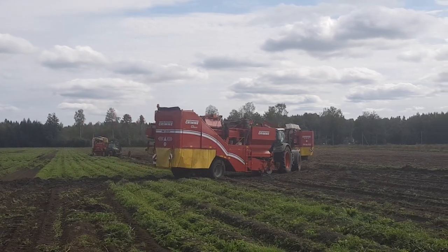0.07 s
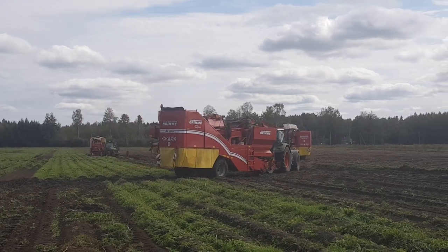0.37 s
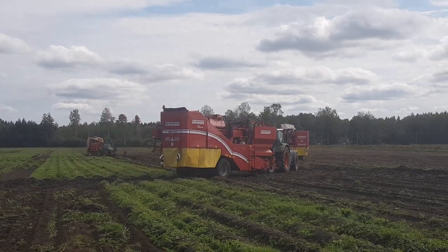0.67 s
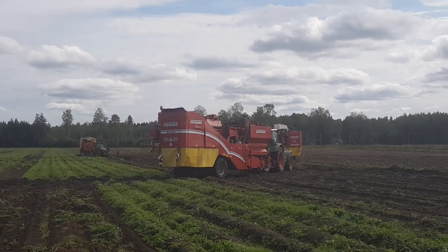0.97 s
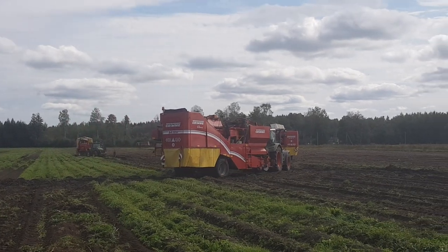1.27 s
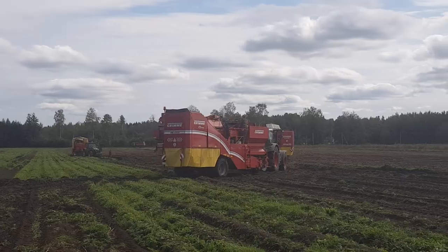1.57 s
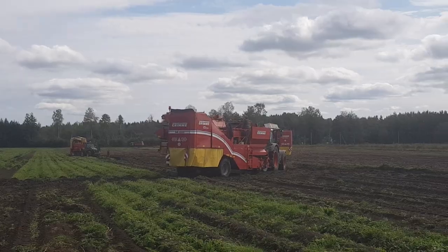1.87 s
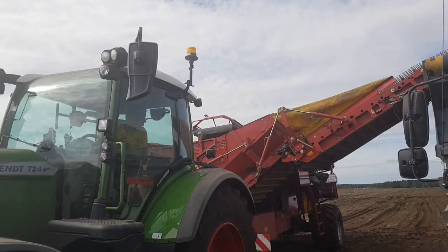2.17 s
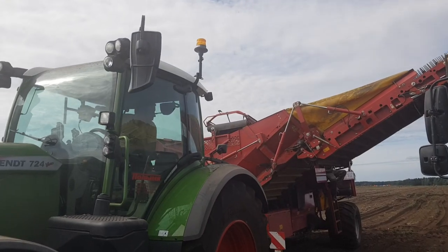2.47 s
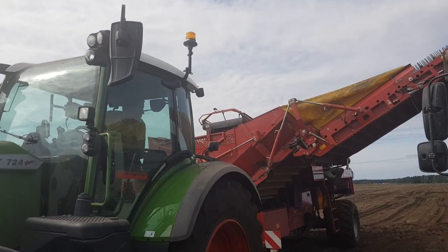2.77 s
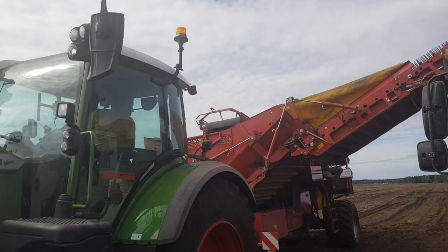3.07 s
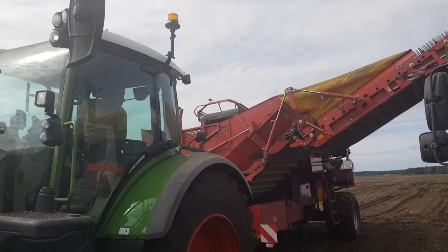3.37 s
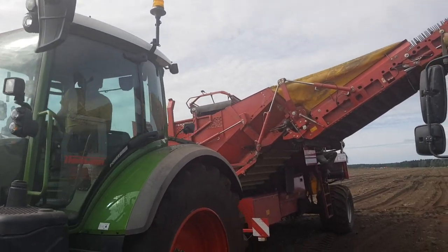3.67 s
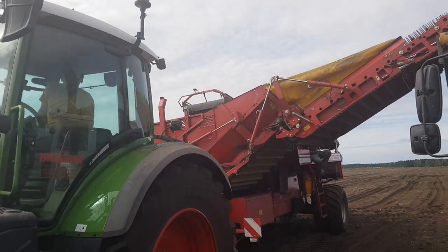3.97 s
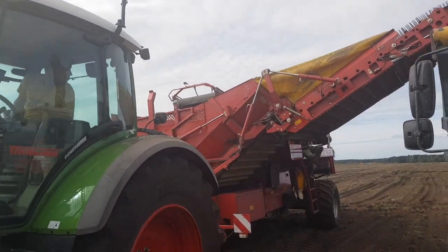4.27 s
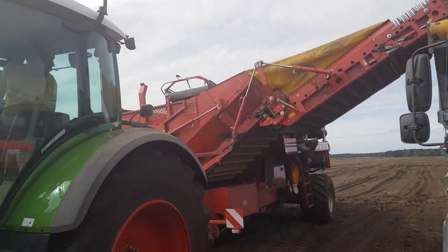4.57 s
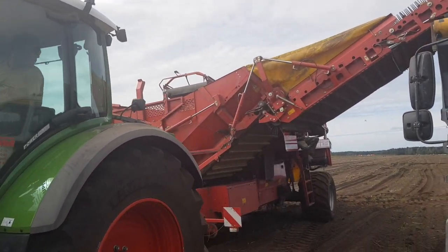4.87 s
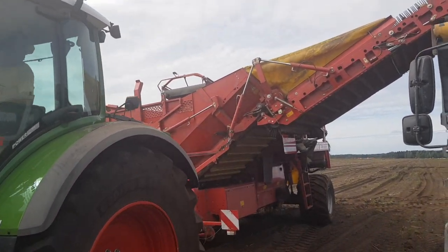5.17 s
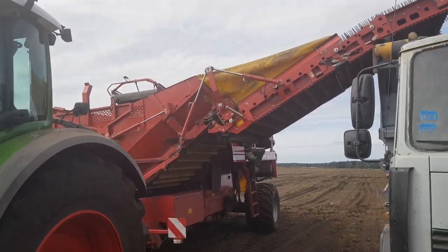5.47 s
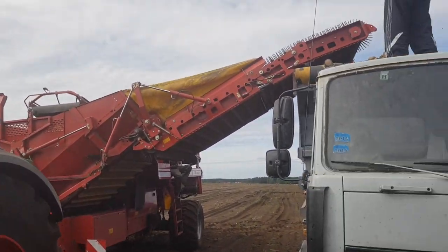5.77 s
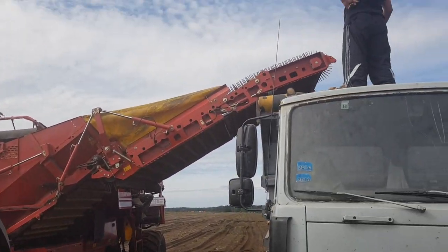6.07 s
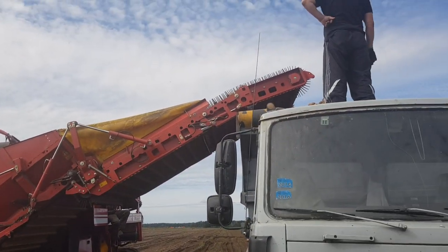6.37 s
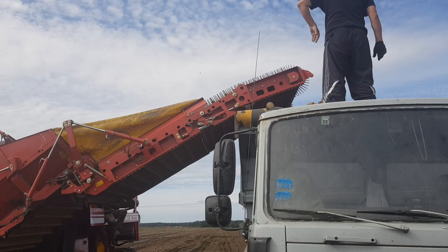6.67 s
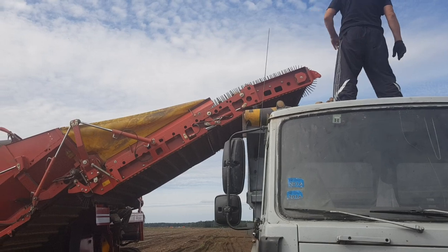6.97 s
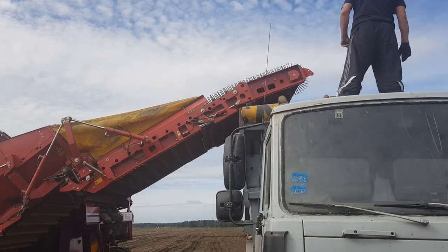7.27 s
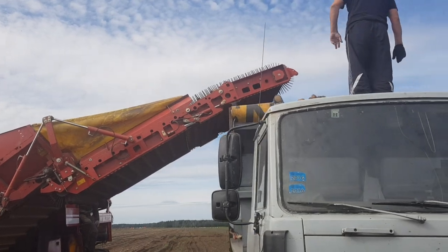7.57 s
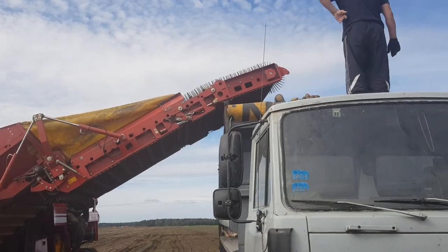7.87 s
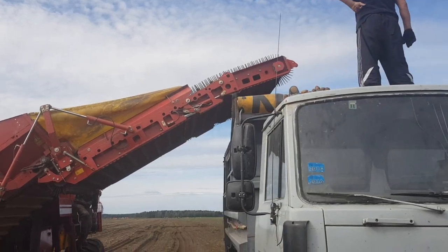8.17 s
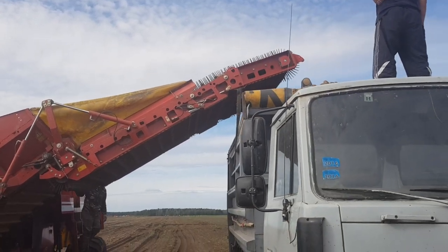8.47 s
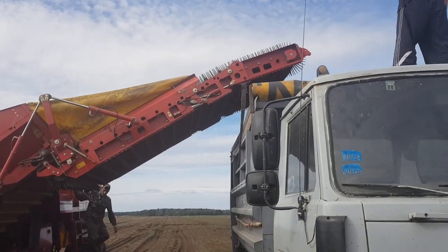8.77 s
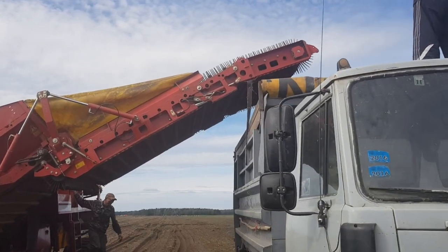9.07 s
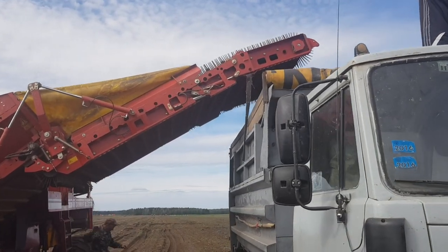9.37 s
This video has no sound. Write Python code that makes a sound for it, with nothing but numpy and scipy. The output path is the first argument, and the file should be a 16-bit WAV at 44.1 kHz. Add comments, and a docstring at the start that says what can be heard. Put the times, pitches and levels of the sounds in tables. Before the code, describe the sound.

Distant farm machinery hums, then close diesel engines knock and clatter while a conveyor jingles, scrapes and squeals briefly.

```python
"""First a potato harvester rumbles far off in a field. After a short silence, at about 1.9 s, the
listener stands by its tractor and moves toward an idling truck. Periodic firings make both diesels
throb and knock, while impacts in the unloading elevator set its chain rattling and jingling.
From about 4.5 s the truck's meshing timing gears whine. Between 6 and 7 s friction makes the
elevator belt scrape and squeal on its guides; then the truck idles on."""
import sys
import numpy as np
from scipy import signal
from scipy.fft import rfft, irfft
from scipy.io import wavfile
from scipy.ndimage import uniform_filter1d

SR = 44100
rng = np.random.default_rng(int(sys.argv[2]) if len(sys.argv) > 2 else 0)


def wrap_up_sound(samples):
    """Save the sound to the file named by the first command line argument, as 16-bit audio."""
    columns = np.atleast_2d(samples).T
    # keep every value between -1 and 1, then stretch to whole-number steps
    tamed = np.clip(columns, -1, 1)
    steps = np.round(tamed * 32767).astype(np.int16)
    wavfile.write(sys.argv[1], SR, steps)


N = 415422
T = np.arange(N) / SR
FREQ = np.maximum(np.fft.rfftfreq(N, 1 / SR), 1)
FAR_END_S, NEAR_START_S = 1.875, 1.92
LOW_CUT_HZ, HIGH_CUT_HZ = 53, 15750

# The listener's path. Each row: time in seconds, truck's share of the power, treble gain in dB.
PATH = [(1.9, 0.07, -0.5), (3.2, 0, -1), (4.5, 0.21, -3.5), (5.0, 0.32, -1.5), (6.0, 0.8, -2),
        (7.3, 0.99, -0.5), (8.4, 1, 0), (9.4, 0.73, 3.5)]
# Likeness of left and right. Each row: frequency in Hz, coherence from 0 to 1.
FAR_COHERENCE = [(40, 1), (1200, 0.99), (2000, 0.5), (2600, 0.29), (3400, 0.96), (4800, 0.48), (7000, .78),
                 (10000, .2)]
NEAR_COHERENCE = [(40, 0.86), (250, 0.99), (700, 0.73), (1400, 0.88), (2200, 0.35), (3500, 0.24),
                  (14000, 0)]
# Direction of each source. Each row: frequency in Hz, left minus right level in dB.
TRACTOR_PAN = [(60, 1.0), (110, 1.5), (200, 1.0), (380, -0.5), (700, -2), (1290, 1.5), (2380, 1.5),
               (4400, 1), (8120, 0.5), (15000, 0.5)]
TRUCK_PAN = [(1200, -2.5), (2400, -5), (3300, 8), (3900, 1), (4600, -4.5), (5800, -3), (7800, -3),
             (14000, -3)]
BELT_PAN = [(4000, 1.5), (7000, -1), (7800, 1), (9400, -6), (10300, 3), (12800, 3), (14000, 2)]
# Spectral envelopes. Each row: frequency in Hz, relative level in dB.
FAR_RUMBLE_SPECTRUM = [(20, -32), (38, -26), (60, -5), (130, -0.5), (205, -4.5), (290, -14.5), (400, -22),
                       (530, -12.5), (750, -17), (950, -11.5), (1180, -14.5), (1350, -22), (1700, -17),
                       (1950, -28.5)]
FAR_CLATTER_SPECTRUM = [(1600, -11), (2150, 0.5), (2450, -16), (2750, -11), (3050, -3), (3600, 0),
                        (4500, -9.5), (5800, -8), (6700, -18.5), (9000, -22.5), (11000, -27), (15500, -28)]
TRACTOR_BODY_SPECTRUM = [(15, -18), (25, -20), (44, -11), (81, -13.5), (147, 0.5), (182, 2), (273, -4.5),
                         (334, -7), (403, -8), (510, -16), (714, -8), (790, -6), (859, -10.5),
                         (1070, -14.5), (1400, -8.5), (1820, -11), (3080, -120)]
TRACTOR_METAL_SPECTRUM = [(590, -26), (1000, 10), (1080, -8), (1200, -2.5), (1530, -1.5), (2310, -3.5),
                          (2810, -8), (3150, -6.5), (4240, -10), (5400, -14), (5850, -13), (7360, -15.5),
                          (9690, -24.5), (11100, -21.5), (12200, -25.5), (15500, -27)]
TRUCK_BODY_SPECTRUM = [(15, -10), (25, -14), (43, -5), (80, -10.5), (118, -0.5), (235, -0.5), (493, -11),
                       (613, -9.5), (667, -13.5), (776, -13), (888, -16.5), (1290, -18.5), (1400, -8),
                       (1820, -54), (3080, -120)]
TRUCK_METAL_SPECTRUM = [(590, -31), (1000, 4), (1300, 1), (2310, -1), (2770, -5), (3110, -5), (3570, -7),
                        (3870, -1.5), (4100, -5.5), (4700, -2), (5400, -12.5), (6870, -11), (8540, -21.5),
                        (11200, -19), (15500, -25)]
SCRAPE_SPECTRUM = [(1200, -11), (2200, -0.5), (3300, -4), (5000, 0.5), (7000, -0.5), (8500, -6.5),
                   (10000, -3.5), (13000, -4), (15500, -10)]
# Steady tones of exhausts, shafts and gears. Each row: frequency in Hz, relative level in dB.
FAR_HUM = [(42.3, -50.5), (62.4, -54), (85, -67), (157, -56.5), (1190, -70.5)]
TRACTOR_HUM = [(42.6, -41.5), (45.1, -53), (52.8, -38.5), (85.2, -53), (273.8, -37), (737.4, -44),
               (791.5, -51), (1231, -54), (2309, -54.5), (4022, -59)]
TRUCK_HUM = [(42.6, -38), (45.1, -56), (52.8, -52), (80.2, -44.5), (85.2, -48.5), (120.3, -42.5),
             (212.5, -43), (627, -49.5), (701, -55), (762.5, -54)]
# Damped modes. Each row: natural frequency in Hz, bandwidth in Hz, relative level in dB.
FAR_LINK_MODES = [(3100, 400, -3), (3950, 250, 5), (5300, 500, 4), (5700, 260, -1)]
NEAR_LINK_MODES = [(4990, 100, 3.5), (5400, 120, 5.5), (5520, 120, 2.5), (11200, 600, -13)]
LOOSE_METAL_MODES = [(2090, 110, -1), (2340, 110, 3), (3080, 110, -4), (4660, 170, -1.5)]
BELT_GUIDE_MODES = [(2230, 400, -4), (3400, 180, 6.5), (4740, 300, -4), (6660, 360, 4.5), (7540, 200, 3),
                    (10150, 250, -10), (11600, 250, -3), (12750, 250, -1), (13700, 250, -4)]
TRUCK_BODY_MODES = [(256, 32, -9.5)]
# Passing tones. Each row: start and length in seconds, pitch in Hz, relative level in dB.
DISTANT_WHINES = [(-.3, 1.55, 3555, -65.5), (1.25, .7, 3560, -70), (.7, .6, 4750, -75),
                  (1.3, .7, 4700, -73), (.525, .075, 5600, -64), (.56, .135, 5870, -65.5),
                  (1.36, .05, 5750, -68.5), (1.44, .12, 5800, -68.5)]
LINK_CHIRPS = [(2.045, .014, 5500, -41), (2.222, .016, 5450, -42), (2.638, .02, 5520, -46),
               (2.679, .014, 5040, -42.5), (2.716, .01, 5000, -46), (2.867, .014, 5000, -39.5),
               (2.908, .007, 5030, -42), (2.982, .01, 5000, -44), (2.996, .014, 5400, -41.5),
               (3.02, .008, 5000, -39), (3.055, .015, 5350, -45), (3.211, .008, 5000, -43),
               (4.385, .012, 5350, -43.5), (9.183, .01, 5000, -36)]
PANEL_DRONES = [(4.38, 0.095, 233, -26), (4.68, 0.1, 233, -28), (5.05, .9, 212.5, -40),
                (6.142, 0.28, 241.4, -34.5), (6.45, 0.16, 120.2, -35), (7.242, 0.2, 231.4, -31),
                (7.85, .22, 230, -34.5), (8.534, 0.13, 280, -32), (9.13, .3, 119.8, -35.5)]
# Bursts of noise. Each row: start and length in seconds, relative level in dB.
FAR_CHAIN_SWISHES = [(0.475, 0.075, -60), (.55, .055, -57), (.61, .08, -64), (1.36, 0.2, -69),
                     (1.5, .04, -68)]
BELT_SCRAPES = [(5.983, 0.11, -32.5), (6.09, 0.14, -31), (6.325, 0.082, -35), (6.47, .1, -41),
                (6.577, 0.15, -27.5), (6.63, 0.058, -28.5)]
# Blows on the elevator frame. Each row: time in seconds, peak in dB, resonance and bandwidth in Hz.
FRAME_KNOCKS = [(2.691, -24, 1000, 500), (2.993, -23, 900, 500), (3.663, -19, 850, 600),
                (3.664, -23, 2400, 1500), (4.572, -20.5, 3700, 1800), (5.003, -26, 1800, 2000),
                (5.245, -26, 3800, 1000), (5.511, -21, 2300, 700), (8.329, -19, 4600, 400),
                (8.354, -20.5, 4550, 500), (9.108, -24, 3800, 600)]
# Belt squeals. Each row: start and length in seconds, pitch in Hz, fractional glide, level in dB.
BELT_SQUEALS = [(5.979, .018, 7830, -.01, -27), (6.01, 0.039, 7710, 0.0028, -26.5),
                (6.012, 0.047, 12820, 0, -41), (5.99, 0.07, 10080, -.015, -39),
                (6.075, 0.095, 9500, -.012, -34.5), (6.18, 0.04, 9400, -.003, -32.5),
                (6.351, 0.032, 9340, -.018, -31), (6.578, .03, 12700, .01, -34),
                (6.606, .028, 12950, .035, -33), (6.638, 0.008, 7120, -0.016, -13),
                (6.654, 0.015, 7020, -0.014, -16), (6.641, .022, 13850, 0, -30),
                (6.648, .01, 10250, 0, -43), (6.684, 0.0054, 6900, -0.00037, -20),
                (6.685, .011, 13700, .005, -26), (6.689, 0.007, 10250, 0, -40),
                (6.693, 0.018, 7060, 0, -17.5), (6.697, 0.015, 6880, -.005, -18.5),
                (6.699, .03, 13900, -.065, -37)]
# Gear mesh lines. Each entry: a multiple of the truck's firing rate; below, its relative level in dB.
MESH_ORDERS = [38, 76, 77, 94, 95, 96]
MESH_DB = [-4, -0.5, -32, -33, 4, -0.5]
# Tones reach the two sides by different paths. Each pair: left and right phase in radians.
WHINE_PHASES = [0.9, -0.9]
SQUEAL_PHASES = [0.45, -0.45]
# Brief swells and sags. Each row: start and length in seconds, change in dB.
WHINE_SWELLS = [(6.75, 0.96, -4.5), (7.9, .38, 1), (8.3, .2, -5), (8.52, .6, 2), (9.138, .16, -6)]
BOOM_SWELLS = [(2.39, 0.086, -3.5), (2.54, 0.055, 3), (3.176, .06, 2.5), (3.23, 0.045, -2),
               (3.66, 0.046, 3), (3.763, .06, -0.5), (3.867, .13, 2), (4.088, 0.089, -3.5)]
# Dips of the machine noise. Each row: start and hold in seconds, depth in dB.
LEVEL_DIPS = [(4.766, 0.44, 2), (6.634, 0.98, 5)]
# The truck's settling idle. Each row: time in seconds, firing rate in Hz.
TRUCK_FIRING_RATE = [(5.4, 41.05), (6.0, 40.62), (6.6, 40.1), (7.6, 40.05), (7.95, 40.2), (8.3, 40.0),
                     (8.75, 40.12), (9.4, 40.0)]
# Bands along the path. Each row: time in seconds, then engine boom, casing roar and clatter in dB.
BAND_LEVELS = [(1.95, -27, -33.5, -38.5), (3.35, -25.5, -31.5, -36.5), (4.62, -25, -34.5, -34.5),
               (4.76, -28.5, -36.5, -38.5), (4.83, -30, -38.5, -37), (5.1, -28.5, -37, -37.5),
               (5.7, -30.5, -40.5, -38.5), (6.55, -30, -38.5, -37.5), (7.3, -29, -37.5, -38),
               (8.55, -29, -35, -37), (9.42, -28.5, -34, -39.4)]


def undb(db):
    """Amplitude ratio for a level in decibels."""
    return 10 ** (np.asarray(db) / 20)


def unit(x):
    """Normalisation to rms 1."""
    return x / np.sqrt(np.mean(x ** 2))


def curves(table):
    """Linear interpolation of each column in time."""
    times, *columns = np.transpose(table)
    return [np.interp(T, times, column) for column in columns]


def across(points):
    """Interpolation on a logarithmic frequency axis."""
    hz, value = np.transpose(points)
    return np.interp(np.log(FREQ), np.log(hz), value)


def shape(x, gain):
    """Filtering as multiplication of the spectrum."""
    return irfft(rfft(x) * gain, N)


def below(hz):
    """Fifth-order Butterworth low-pass gain."""
    return 1 / np.sqrt(1 + (FREQ / hz) ** 10)


def above(hz):
    """High-pass gain, the power complement of below()."""
    return np.sqrt(1 - below(hz) ** 2)


def band_unit(x, lo_hz, hi_hz):
    """Normalisation of the stereo centre to rms 1 within a band."""
    return x / np.std(shape(x.mean(axis=0), (FREQ > lo_hz) & (FREQ < hi_hz)))


def wander(rate):
    """Smoothed noise with a spread near 1 and `rate` changes a second."""
    hold = max(int(SR / rate), 1)
    steps = np.repeat(rng.standard_normal(N // hold + 1), hold)[:N]
    return 1.304 * uniform_filter1d(uniform_filter1d(steps, hold), hold)


def cycles(hz, drift):
    """Phase in cycles, the integral of a slightly drifting frequency."""
    return np.cumsum(hz * (1 + drift * wander(5))) / SR


def gate(start, length, edge_s, t=T):
    """Amplitude envelope with soft edges."""
    return (1 + np.tanh((t - start) / edge_s)) * (1 + np.tanh((start + length - t) / edge_s)) / 4


def resonances(modes):
    """Superposed complex responses of damped oscillators."""
    return sum(undb(db) / (1 + 1j * (FREQ / hz - hz / FREQ) * hz / width) for hz, width, db in modes)


def pan(balance):
    """Level difference between the sides, as two gains by frequency."""
    return undb(np.array([[.5], [-.5]]) * across(balance))


def stereo(pair, coherence, lag_ms):
    """Partial coherence: two signals mix as mid and side; a positive lag delays the right."""
    alike = np.clip(across(coherence), 0, .999)
    mid, side = shape(pair[0], np.sqrt(1 + alike)), shape(pair[1], np.sqrt(1 - alike))
    return np.array([mid + side, shape(mid - side, np.exp(-2j * np.pi * FREQ * lag_ms / 1000))])


def combustion(turn, repeat, knock, decay, scatter_db, cylinders=6):
    """Periodic excitation: each firing is a dying burst; part recurs on each round of the cylinders."""
    firing, phase = turn.astype(int), turn % 1
    size = int(cylinders * N / turn[-1])
    place = turn % cylinders / cylinders * size
    pattern = np.array([np.interp(place, np.arange(size), p) for p in rng.standard_normal((2, size))])
    noise = np.sqrt(repeat) * unit(pattern) + np.sqrt(1 - repeat) * rng.standard_normal((2, N))
    scatter = rng.standard_normal(N)[firing] + .5 * rng.standard_normal(cylinders)[firing % cylinders]
    return unit(noise * (1 + knock * undb(scatter_db * scatter) * np.exp(-phase / decay)))


def rattle(rate, spread_db, ring_s):
    """Poisson impacts: random blows, a few much harder than the rest, decay exponentially."""
    blows = (rng.random(N) < rate / SR) * undb(spread_db * np.minimum(rng.exponential(size=N), 4))
    power = signal.lfilter([1], [1, -np.exp(-2 / (ring_s * SR))], blows ** 2)
    return unit(np.sqrt(power + 1e-12) * rng.standard_normal((2, N)))


def ring_mode(blows, mode, skirt):
    """Resonance in one mode; a band `skirt` times as wide steepens its flanks."""
    hz, width, _ = mode
    return shape(blows, resonances([mode]) * resonances([(hz, skirt * width, 0)]))


def hum(table, drift, waver_db):
    """Line spectrum of rotating machinery, wandering in pitch and strength."""
    return sum(np.sqrt(2) * undb(db + waver_db * wander(4.3)) * np.sin(2 * np.pi * cycles(hz, drift))
               for hz, db in table)


def far_harvester():
    """Interference with the bounce off the soil notches a distant rumble; chains swish, tones whine."""
    rumble_db = -46 - 0.7 * T + 1.3 * wander(7.6)  # fades as it recedes
    turn = cycles(hz=62.4, drift=0.00407)
    throb = combustion(turn, repeat=0.21, knock=0.46, decay=0.24, scatter_db=0.5)
    rumble = unit(shape(throb, undb(across(FAR_RUMBLE_SPECTRUM)) * below(2330)))
    knock = combustion(turn, repeat=.07, knock=.45, decay=.25, scatter_db=5.0)
    clatter = unit(shape(knock, undb(across(FAR_CLATTER_SPECTRUM)) * above(1600)))
    links = rattle(rate=1300, spread_db=5.0, ring_s=.015)
    swish = unit(shape(links, resonances(FAR_LINK_MODES) * below(8100)))
    swish *= sum(undb(db) * gate(s, length, edge_s=.018) for s, length, db in FAR_CHAIN_SWISHES)
    whine = 0
    for start, length, hz, db in DISTANT_WHINES:
        envelope = undb(db + 1.9 * wander(39.4)) * gate(start, length, edge_s=.08)
        whine += envelope * np.sin(2 * np.pi * cycles(hz, drift=0.00306) + 1.1 * wander(90))
    noise = undb(rumble_db) * rumble + undb(-61.5) * clatter + swish
    noise = stereo(noise, FAR_COHERENCE, lag_ms=-0.032) / np.sqrt(2)
    return noise + whine + hum(FAR_HUM, drift=0.00376, waver_db=-3.5)


def loose_fittings(truck_share):
    """Impact excitation: loose metal on the truck taps, each part ringing its own mode."""
    taps = sum(ring_mode(rattle(rate=28, spread_db=2.5, ring_s=.003), mode, skirt=5)
               for mode in LOOSE_METAL_MODES)
    return unit(taps) * undb(-43.5) * truck_share


def chain_jingle():
    """Modal ringing: loose links collide in clusters, fading as they are left behind."""
    level_db = -43 - 0.5 * (T - NEAR_START_S)
    links = 0
    for mode in NEAR_LINK_MODES:
        blows = rattle(rate=500, spread_db=1.5, ring_s=0.0068)
        links += ring_mode(blows, mode, skirt=4) * undb(2.1 * wander(22.06))
    return unit(links) * undb(level_db) * gate(0, length=4.56, edge_s=.1)


def link_chirps():
    """Dry friction: turning links give short rough chirps near their ringing pitch."""
    wavering_time = np.cumsum(1 + .025 * wander(900)) / SR
    grip = np.sqrt(2) * undb(6 * np.array([wander(500), wander(500)]))
    return grip * sum(undb(db) * gate(s, length, edge_s=.003) * np.sin(2 * np.pi * hz * wavering_time)
                      for s, length, hz, db in LINK_CHIRPS)


def frame_knocks():
    """Transient response: each hard blow excites a broad resonance of the elevator frame."""
    knocks = 0
    for start, db, hz, width in FRAME_KNOCKS:
        blow = rng.standard_normal((2, N)) * (T >= start) * np.exp(-np.abs(T - start) / 0.0023)
        ring = shape(blow, resonances([(hz, width, 0)]))
        knocks += undb(db) * ring / np.abs(ring).max()
    return knocks


def panel_drones():
    """Sympathetic resonance: panels hum briefly when the engines shake them at their own pitch."""
    wobble = 0.39 * wander(25)
    return sum(np.sqrt(2) * undb(db) * gate(s, length, 0.021) * np.sin(2 * np.pi * hz * T + wobble)
               for s, length, hz, db in PANEL_DRONES)


def gear_whine(truck_turn, truck_share):
    """Tooth meshing: timing gears sing with sidebands one firing rate apart, louder near the truck."""
    level_db = -45 - 14 * (1 - truck_share)
    level_db += sum(db * gate(s, length, edge_s=.03) for s, length, db in WHINE_SWELLS)
    side_phase, side_db = np.array(WHINE_PHASES)[:, None], np.array([[4.0], [-2.0]])
    lines = 0
    for order, db in zip(MESH_ORDERS, MESH_DB):
        flutter = undb(db + 1.7 * wander(55) + 0.93 * wander(9))
        lines += flutter * np.sin(2 * np.pi * order * truck_turn + 0.34 * wander(70) + side_phase)
    return lines * undb(level_db + side_db) * gate(start=4.5, length=6, edge_s=1.0)


def belt_scrapes():
    """Sliding friction: the belt hisses on its steel guides; each scrape dies away between machines."""
    power = 0
    for start, length, db in BELT_SCRAPES:
        tail = undb(-10.5) * (T > start + length) * np.exp(-np.abs(T - start - length) / 0.11)
        power += (undb(db) * np.maximum(gate(start, length, edge_s=0.021), tail)) ** 2
    drag = np.sqrt(power) * undb(1.2 * wander(110))  # the drag sputters
    slips = rattle(rate=6000, spread_db=1, ring_s=.002)
    return drag * unit(shape(slips, undb(across(SCRAPE_SPECTRUM)) * (1 + resonances(BELT_GUIDE_MODES))))


def belt_squeals():
    """Stick-slip oscillation: the belt catches into unsteady tones, which ring on briefly."""
    squeals = np.zeros((2, N))
    for start, length, hz, glide, db in BELT_SQUEALS:
        span = (T > start - .02) & (T < start + length + .12)
        t = T[span]
        waver = unit(uniform_filter1d(rng.standard_normal(len(t)), size=45))
        pitch = hz * (1 + glide * np.clip((t - start) / length, 0, 1) + 0.009 * waver)
        phase = 2 * np.pi * np.cumsum(pitch) / SR + np.array(SQUEAL_PHASES)[:, None]
        grip = undb(4 * np.tanh(unit(uniform_filter1d(rng.standard_normal((2, len(t))), size=130))))
        octave = undb(-20) * np.sin(2 * phase) * (2 * hz < .95 * HIGH_CUT_HZ)
        ring = undb(-10) * (t > start + length) * np.exp(-np.abs(t - start - length) / 0.024)
        envelope = np.maximum(gate(start, length, edge_s=.003, t=t), ring)
        squeals[:, span] += undb(db) * grip * (np.sin(phase) + octave) * envelope
    return shape(squeals, 1)


def engine_bodies(tractor_turn, truck_turn, truck_share):
    """Forced vibration: the firings throb through each machine's body."""
    tractor = combustion(tractor_turn, repeat=0.11, knock=0.35, decay=0.44, scatter_db=1.0)
    tractor = unit(shape(tractor, undb(across(TRACTOR_BODY_SPECTRUM))))
    truck = combustion(truck_turn, repeat=0.32, knock=0.6, decay=0.23, scatter_db=4.0)
    truck = unit(shape(truck, undb(across(TRUCK_BODY_SPECTRUM)) * (1 + resonances(TRUCK_BODY_MODES))))
    both = np.sqrt(1 - truck_share) * tractor + np.sqrt(truck_share) * truck
    return stereo(both, NEAR_COHERENCE, lag_ms=0.3)


def metal_clatter(tractor_turn, truck_turn, truck_share):
    """Impact noise: the diesels knock in their blocks while links and clods strike the elevator."""
    elevator = undb(-8.5) * rattle(rate=200, spread_db=3.5, ring_s=0.015)
    tractor = combustion(tractor_turn, repeat=.1, knock=0.29, decay=0.17, scatter_db=2.5)
    truck = combustion(truck_turn, repeat=0.21, knock=0.37, decay=0.21, scatter_db=3)
    metal = 0
    for share, knock, colour, sides in ((1 - truck_share, tractor, TRACTOR_METAL_SPECTRUM, TRACTOR_PAN),
                                        (truck_share, truck, TRUCK_METAL_SPECTRUM, TRUCK_PAN)):
        blows = stereo(knock + elevator, NEAR_COHERENCE, lag_ms=0.385)
        metal += np.sqrt(share) * unit(shape(blows, undb(across(colour)) * pan(sides) * above(1270)))
    return band_unit(metal, 1380, 3150)


def near_diesels(truck_turn, truck_share, treble_db):
    """Superposition: boom, roar, clatter and hum of two engines, crossfaded along the path."""
    boom_db, roar_db, clatter_db = curves(BAND_LEVELS)
    tractor_turn = cycles(hz=52.8, drift=.002)
    body = engine_bodies(tractor_turn, truck_turn, truck_share)
    swell_db = sum(db * gate(s, length, edge_s=.015) for s, length, db in BOOM_SWELLS)
    boom = band_unit(shape(body, below(442)), 85, 500) * undb(boom_db + swell_db + 0.66 * wander(16))
    roar = band_unit(shape(body, above(439) * below(1210)), 450, 1340) * undb(roar_db)
    metal = metal_clatter(tractor_turn, truck_turn, truck_share)
    # the treble is shadowed first as the machines screen each other
    metal += (undb(treble_db) - 1) * shape(metal, above(3250) ** 2)
    tones = (1 - truck_share) * hum(TRACTOR_HUM, drift=0.00124, waver_db=3.0)
    tones += truck_share * hum(TRUCK_HUM, drift=0.00117, waver_db=2.5)
    return boom + roar + metal * undb(clatter_db) + tones * undb(0.72 * (boom_db + 27.5))


def dips(fall_s=0.028, recover_s=0.58):
    """Amplitude modulation: the level sinks quickly, holds and recovers slowly."""
    loss_db = 0
    for start, hold, depth_db in LEVEL_DIPS:
        fall, recovery = (T - start) / fall_s, 1 - (T - start - fall_s - hold) / recover_s
        loss_db += depth_db * np.clip(np.minimum(fall, recovery), 0, 1)
    return undb(-loss_db)


def scene():
    """Sources add linearly: the distant harvester, a short silence, then the near machines."""
    truck_share, treble_db = curves(PATH)
    truck_turn = cycles(curves(TRUCK_FIRING_RATE)[0], drift=0.000705)
    machines = near_diesels(truck_turn, truck_share, treble_db) + panel_drones()
    machines += gear_whine(truck_turn, truck_share)
    machines += chain_jingle() + frame_knocks() + link_chirps() + loose_fittings(truck_share)
    belt = shape(belt_scrapes() + belt_squeals(), pan(BELT_PAN))  # heard past the truck's cab
    near = (machines * dips() + belt) * np.clip((T - NEAR_START_S) / 0.017, 0, 1)
    far = far_harvester() * np.clip((FAR_END_S - T) / 0.0014, 0, 1)
    return (far + near) * undb(np.array([[.35], [-.35]]))


def record(dry):
    """Band limiting: filters cut the deepest bass and the highest treble."""
    thinned = signal.sosfilt(signal.butter(2, LOW_CUT_HZ, "high", fs=SR, output="sos"), dry)
    return signal.sosfilt(signal.ellip(10, .2, 80, HIGH_CUT_HZ, fs=SR, output="sos"), thinned)


dry = scene()
out = record(dry)
wrap_up_sound(out)
```